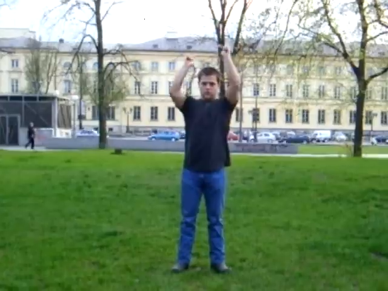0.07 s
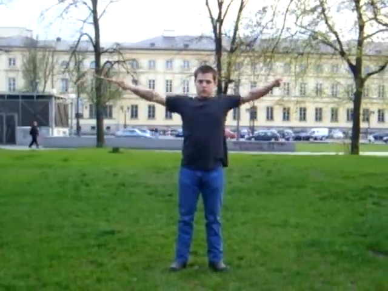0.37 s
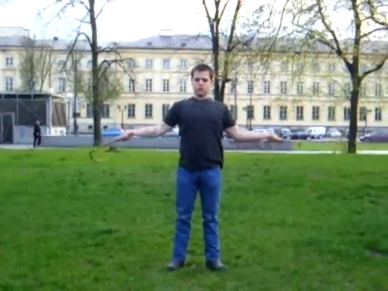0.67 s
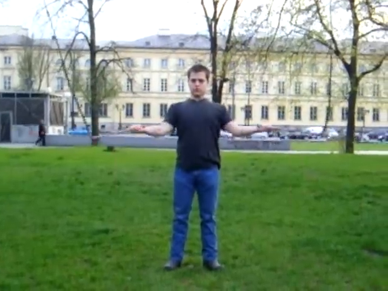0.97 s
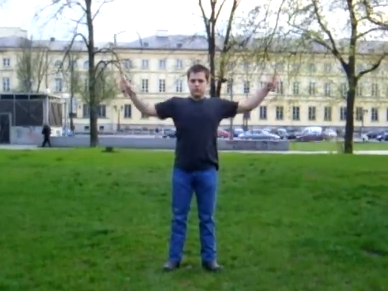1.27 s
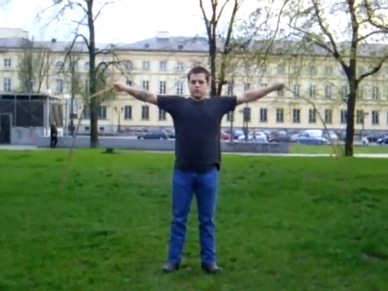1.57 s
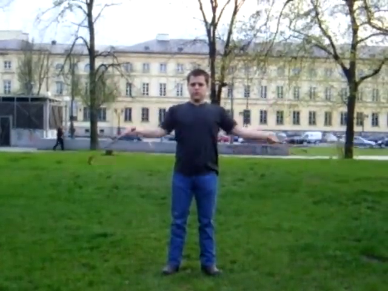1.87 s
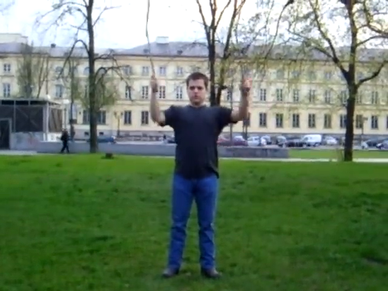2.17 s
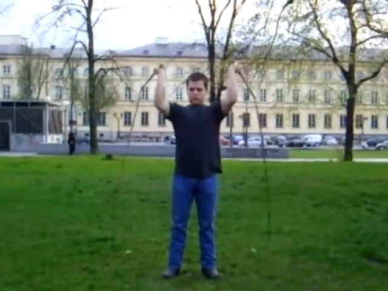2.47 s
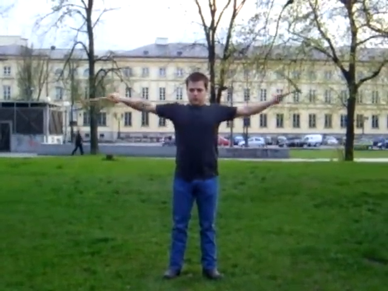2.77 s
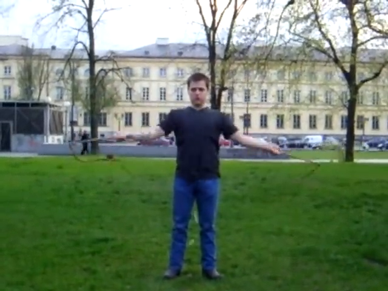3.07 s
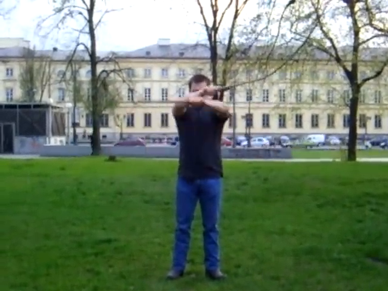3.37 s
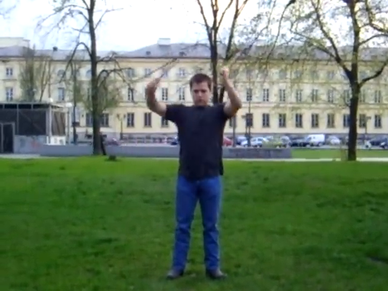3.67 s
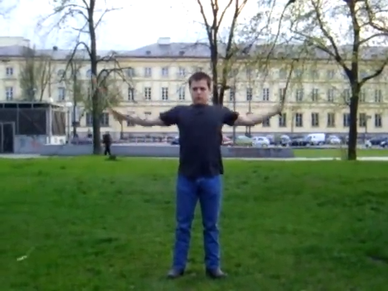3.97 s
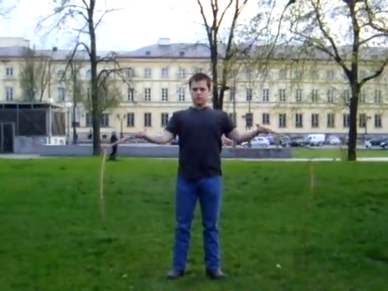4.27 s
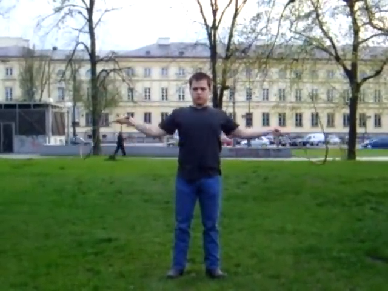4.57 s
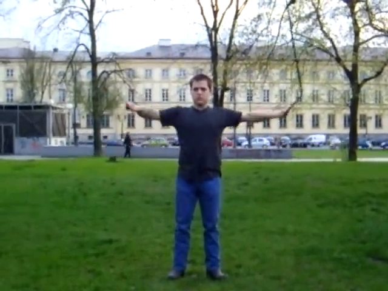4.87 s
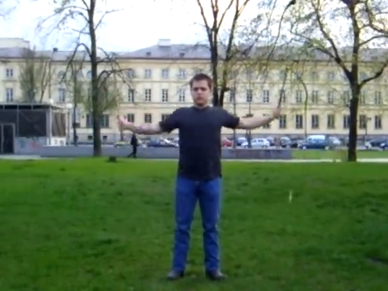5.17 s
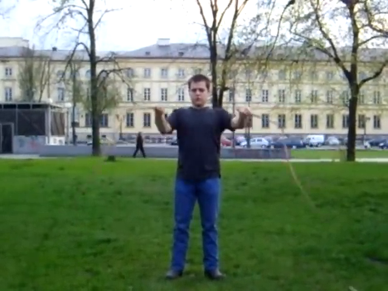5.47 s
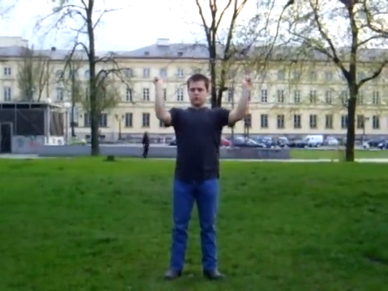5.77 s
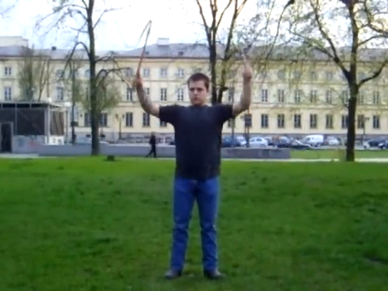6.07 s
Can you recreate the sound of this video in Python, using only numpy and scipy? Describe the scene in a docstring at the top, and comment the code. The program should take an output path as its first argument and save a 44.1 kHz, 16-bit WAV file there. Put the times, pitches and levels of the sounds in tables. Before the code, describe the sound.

Sharp whip cracks, mostly in quick pairs, echo across a park, with faint swishes and distant traffic underneath.

```python
"""Two whips crack on a park lawn, a few metres from a small camera microphone that overloads.
Each crack is a shock wave and its bounce off the ground; the trees spray it back, walls and trunks
return single slaps, then the park rings on. Between the cracks the thongs swish and pop,
over a bed of distant traffic and two droning engines."""
import sys
import numpy as np
from scipy import signal
from scipy.fft import rfft, irfft
from scipy.io import wavfile

SR = 44100
rng = np.random.default_rng(int(sys.argv[2]) if len(sys.argv) > 2 else 0)


def pcm_store(signal):
    """Save signal as 16-bit PCM."""
    levels = np.round(np.clip(np.atleast_2d(signal), -1, 1) * 32767)
    wavfile.write(sys.argv[1], SR, levels.astype(np.int16).T)


N = 270333
TIME = np.arange(N) / SR
BAND_HZ = 5900  # top of the microphone's band

# whip cracks: t/s, level before overload/dB, shock length/ms, ground bounce delay/ms, bounce/dB,
# raggedness/dB, tree echo/dB, tree echo delay/s
CRACKS = [(0.6839, 3, .18, 3.2, -6.5, -13.5, -23.5, 0.057), (.7202, 10.5, 0.056, 3.1, -9.5, -4, -21, 0.059),
          (.9850, 2, 0.094, 1.25, -7, 1.5, -39, 0.097), (0.9908, 7, 0.091, 1.86, -12, 0.5, -41, 0.071),
          (1.545, 6, 0.05, 1.93, -17.5, 1.5, -28, 0.053), (1.5686, -7.5, 0.14, 2.83, -5.5, 5, -37, .070),
          (2.1024, 10, 0.047, 2.39, -3, -3, -22.5, .047), (2.1275, 9.5, 0.14, 2.62, -6.5, 2, -26.5, 0.063),
          (2.999, -5, 0.25, 3.08, -2, 3, -25.5, 0.04), (3.0259, -13, 1, 3.24, 1, -5, -16.5, 0.034),
          (3.3308, -5.5, 0.34, .9, -4.5, 2, -39, 0.08), (3.3600, -0.5, 0.16, 1.7, -38, -1, -48, 0.028),
          (4.1474, 1.5, 0.2, 3.12, -6, -3, -25, .066), (4.2128, 7.5, 0.074, 1.9, -2, -2.5, -17.5, 0.06),
          (4.4333, -2, 0.15, 1.8, -21, 1, -55, 0.045), (4.4574, -6.5, 0.26, 0.9, -2.5, 0, -53, 0.052),
          (5.5643, 12.5, 0.067, 1.9, -6.5, -1, -21.5, 0.054),
          (5.6130, 9.5, 0.082, 2.07, -6.5, 2.5, -25, 0.065)]
# bright colour of the tree spray and the swish hiss: f/Hz, level/dB
SPRAY_COLOUR = [(100, -11.5), (350, -24.5), (900, -8.5), (1700, -3), (2500, 4), (3100, -2), (3900, 4),
                (4600, 1), (5300, -7.5), (6000, -13.5)]


def gain_of(db):
    """Decibels to amplitude."""
    return 10 ** (np.asarray(db) / 20)


def evened(x):
    """Scales to rms 1."""
    return x / np.sqrt(np.mean(x ** 2) + 1e-20)


def read(points, hz):
    """Reads a curve on a log-frequency axis."""
    f, value = np.transpose(points)
    return np.interp(np.log(hz + 1), np.log(f + 1), value)


def add(mix, s, sound):
    """Mixes a sound in at time s."""
    part = mix[max(round(s * SR), 0):][:len(sound)]
    part += sound[:len(part)]


def equalised(x, curve):
    """Runs x through an EQ curve."""
    return irfft(rfft(x) * gain_of(read(curve, np.fft.rfftfreq(len(x), 1 / SR))), len(x))


def coloured(x, curve):
    """Gives x a tone colour, at rms 1."""
    return evened(equalised(x, curve))


def wander(size, hz):
    """Smooth random drift of rms 1, rolling off above hz."""
    rolloff = np.exp(-(np.fft.rfftfreq(size, 1 / SR) / hz) ** 2)
    return evened(irfft(rfft(rng.standard_normal(size)) * rolloff, size))


def low_pass(x, hz, taps):
    """A steep linear-phase low-pass."""
    return signal.oaconvolve(x, signal.firwin(taps, hz, window=("kaiser", 8), fs=SR), "same")


def traffic(level_db=-44.5):
    """The wash of distant streets, barely swelling."""
    street_colour = [(12, -51), (20, -19.5), (65, -6), (82, -8.5), (97, -12.5), (352, -15.5), (537, -24),
                     (746, -18.5), (922, -16.5), (1220, -22.5), (1780, -28), (2310, -24.5), (2850, -34.5),
                     (4890, -38), (5500, -46), (7150, -74), (12100, -120)]  # rumble and tyre wash: f/Hz, level/dB
    swell_db = .5 * wander(N, hz=2)
    return gain_of(level_db + swell_db) * coloured(rng.standard_normal(N), street_colour)


def engines(throb=0.29, fade_s=.15):
    """Two far engines drone and throb, one slowing, one gathering speed."""
    glides = [(0, 3.65, 74, 61.97, -55.5), (1.601, 6.13, 68, 78, -53.5)]  # drones: start t/s, end t/s, start f/Hz, end f/Hz, level/dB
    out = np.zeros(N)
    for start, end, from_hz, to_hz, db in glides:
        turns = np.cumsum(np.interp(TIME, [start, end], [from_hz, to_hz])) / SR
        fade = np.interp(TIME, [start - fade_s, start, end, end + fade_s], [0, 1, 1, 0])
        drone = np.sin(2 * np.pi * turns) * (1 + throb * wander(N, hz=8))
        out += gain_of(db) * fade * evened(drone)
    return out


def echo_grain(per_s, flicker_db, uneven_db=2):
    """Thousands of tiny echoes of random size, a few large, arriving in clumps."""
    clicks = rng.standard_normal(N) * (rng.random(N) < per_s / SR)
    clicks *= gain_of(uneven_db * np.minimum(rng.exponential(1, N), 4))
    return clicks * gain_of(flicker_db * wander(N, hz=111))


def park_tail(build_s=0.0067, shock_send_db=-43.5, tree_send_db=-16):
    """Far echoes of every crack and its tree spray die away, the bass lasting longest."""
    tail_colour = [(100, -19.5), (350, -4), (900, 0.5), (1700, -2), (2400, 0), (3100, -4.5), (3900, -2.5),
                   (5000, -13), (6000, -22)]  # tone of the park's reverb: f/Hz, level/dB
    decay_times = [(200, 1.7), (900, 1.43), (2500, 1.585), (5000, 1.35)]  # its decay: f/Hz, T60/s
    grain = coloured(echo_grain(per_s=6000, flicker_db=1.97), tail_colour)
    hz, t, spectrum = signal.stft(grain, SR, nperseg=256)
    t60 = read(decay_times, hz)[:, None]
    sends = [(-0.21, gain_of(-33))]  # a crack just before the start still rings
    for s, db, *_, tree_db, _ in CRACKS:
        sends.append((s, np.hypot(gain_of(db + shock_send_db), gain_of(tree_db + tree_send_db))))
    power = 0
    for s, send in sends:
        age = np.maximum(t - s, 0)
        attack = 1 - np.exp(-age / build_s)
        power += (send * attack * gain_of(-60 * age / t60)) ** 2
    return signal.istft(spectrum * np.sqrt(power), SR, nperseg=256)[1][:N]


def swell_power(s, db, rise_s, fall_s=0.038):
    """The spray's power swells as the shock enters a tree, peaks at time s and fades as it leaves."""
    return gain_of(db) ** 2 * np.exp(-2 * np.maximum((s - TIME) / rise_s, (TIME - s) / fall_s))


def tree_echoes(far_row_s=0.16, far_row_db=-18):
    """Each crack comes back as a crackling spray from the branches, then again from farther trees."""
    power = 0
    for s, *_, db, delay in CRACKS:
        power += swell_power(s + delay, db, rise_s=0.014)
        power += swell_power(s + delay + far_row_s, db + far_row_db, rise_s=0.055)
    return np.sqrt(power) * coloured(echo_grain(per_s=7500, flicker_db=2.0), SPRAY_COLOUR)


def shock(length_ms, size=2048):
    """A pressure jump with its suction, ringing the microphone port; peak 1."""
    resonances = [(463.5, 158, 9.5), (848, 296, 9.5), (1380, 370, -4.5), (2310, 870, -2), (3580, 670, -1.5),
                  (4570, 1900, -14.5)]  # camera case and microphone port: f/Hz, width/Hz, level/dB
    jf = 1j * np.fft.rfftfreq(size, 1 / SR)
    scaled_jf = 2 * np.pi * jf * length_ms / 1000
    pulse = scaled_jf / (1 + scaled_jf) ** 2
    port = sum(gain_of(db) * jf * width / (hz ** 2 + jf * width + jf ** 2)
               for hz, width, db in resonances)
    band = 1 / (1 + (abs(jf) / BAND_HZ) ** 20)
    lead_in = np.exp(-2 * np.pi * jf * 10 / SR)  # ten samples of room ahead of the front
    wave = irfft(pulse * port * band * lead_in, size)
    return -wave / abs(wave).max()


def roughened(wave, share_db, fade_s):
    """A frayed tip, uneven ground or bark adds a short scatter behind a wave."""
    bump_colour = [(200, -22), (900, -12.5), (2300, 3.5), (5000, 0)]  # small bumps scatter mostly treble: f/Hz, level/dB
    t = np.arange(len(wave)) / SR
    bumps = coloured(rng.standard_normal(len(t)), bump_colour) * np.exp(-t / fade_s)
    scatter = signal.fftconvolve(wave, bumps / np.linalg.norm(bumps))[:len(t)]
    scatter -= wave * (scatter @ wave) / (wave @ wave)  # the front keeps its strength
    return wave + gain_of(share_db) * scatter


def slaps():
    """Crisp single echoes, a little smeared by the walls and trunks that throw them back."""
    returns = [(0.767, -7.5), (0.7731, -6), (0.8025, -21), (.8375, -11.5), (1.075, -14), (1.6015, -15.5),
               (3.085, -8), (3.161, -18), (3.188, -16.5), (3.402, -20), (4.2685, -9)]  # slapbacks: t/s, level/dB
    out = np.zeros(N)
    for s, db in returns:
        add(out, s, gain_of(db) * roughened(shock(length_ms=.08), share_db=1, fade_s=.003))
    return out


def swishes(sag_octaves=0.15, width_share=0.27):
    """Vortices shed by the thong give a fuzzy whistle that sinks as it slows, in a rush of air."""
    # swings of the thong: t/s, level/dB, half length/s, f/Hz, hiss against whistle/dB
    swings = [(.06, -28.5, 0.0075, 2450, -7.5), (0.076, -37, 0.027, 1128, -10),
              (0.543, -50, 0.022, 942, -16), (1.233, -31.5, .008, 1540, -14),
              (1.771, -40.5, .032, 940, -17), (2.901, -51, 0.016, 950, -16), (3.579, -36, .024, 1111, -7.5),
              (3.63, -37.5, 0.015, 1990, -3), (3.986, -45.5, 0.04, 1003, -13),
              (4.835, -43, .0061, 2280, -8), (5.238, -41.5, 0.01, 2120, -1.5)]
    out = np.zeros(N)
    for s, db, half_s, hz, hiss_db in swings:
        t = np.arange(max(-s, -3 * half_s), 3 * half_s, 1 / SR)
        turns = np.cumsum(hz * 2 ** (-sag_octaves * t / half_s)) / SR
        fuzz = wander(len(t), width_share * hz) + 1j * wander(len(t), width_share * hz)
        whistle = evened((fuzz * np.exp(2j * np.pi * turns)).real)
        hiss = gain_of(hiss_db) * coloured(rng.standard_normal(len(t)), SPRAY_COLOUR)
        swell = np.exp(-(t / half_s) ** 2 / 2)
        add(out, s + t[0], gain_of(db) * swell * (whistle + hiss))
    return out


def snap(length_ms, bounce_ms, bounce_db, ragged_db):
    """The shock arrives directly, made ragged by the frayed tip, then again off the lawn."""
    wave = roughened(shock(length_ms), share_db=ragged_db, fade_s=0.0032)
    bounce = gain_of(bounce_db) * roughened(wave, share_db=-9.5, fade_s=0.0022)
    add(wave, bounce_ms / 1000, bounce)
    return wave


def pops():
    """The thong snaps straight without cracking, too softly to wake the trees; a few faint ticks stand among
    them."""
    soft_pops = [(.0570, -20.5, 0.24), (1.76, -19.5, 0.3), (1.899, -35, 0.035), (2.37, -22.5, .19),
                 (3.572, -21.5, 0.33), (4.577, -21.5, 0.21), (4.672, -13, 0.41), (4.712, -24.5, 0.39),
                 (4.923, -37, .04), (4.988, -28, 0.44), (5.0315, -18, 0.19), (5.311, -41.5, 0.026),
                 (5.833, -22.5, 0.89)]  # soft pops and faint ticks: t/s, level/dB, pulse length/ms
    out = np.zeros(N)
    for s, db, length_ms in soft_pops:
        add(out, s, gain_of(db) * snap(length_ms, bounce_ms=2.33, bounce_db=-22, ragged_db=6.5))
    return out


def cracks():
    """Full shock waves in pairs: one whip just after the other."""
    out = np.zeros(N)
    for s, db, length_ms, bounce_ms, bounce_db, ragged_db, _, _ in CRACKS:
        add(out, s, gain_of(db) * snap(length_ms, bounce_ms, bounce_db, ragged_db))
    return out


def scene():
    """Whips, their echoes and the town, in mono."""
    whips = cracks() + pops() + slaps() + tree_echoes() + park_tail() + swishes()
    return (whips + traffic() + engines())[None]


def record(dry, headroom=2.2, lopsided=0.42, ceiling=.73):
    """The camera hears a narrow band; loud cracks overload it with a low thump and a treble splash."""
    treble_eq = [(5500, 0), (7000, -6), (10000, -1), (16000, -2)]  # response after the overload: f/Hz, level/dB
    narrow = low_pass(dry[0], BAND_HZ, taps=141)
    # the capsule saturates softly and yields unequally to push and pull
    pressed = headroom * np.tanh(narrow / headroom)
    pressed += lopsided * pressed ** 2 * np.tanh(pressed ** 2)
    driven = low_pass(pressed, BAND_HZ + 100, taps=141)
    clipped = driven / (1 + (driven / ceiling) ** 20) ** (1 / 20)
    return low_pass(equalised(clipped, treble_eq), hz=16600, taps=255)[None]


dry = scene()
out = record(dry)
pcm_store(out)
```